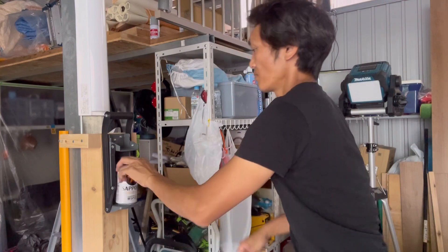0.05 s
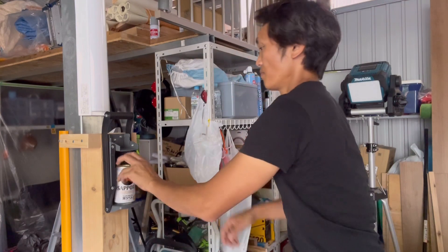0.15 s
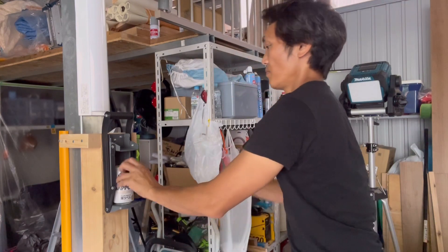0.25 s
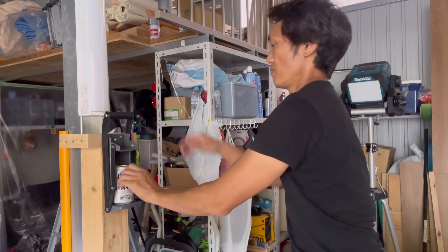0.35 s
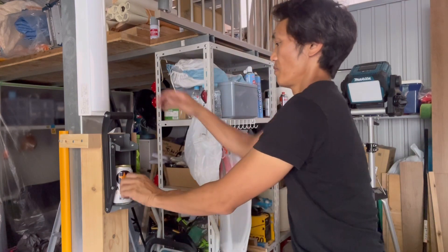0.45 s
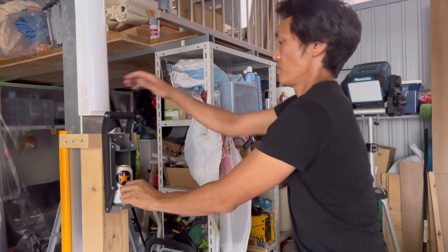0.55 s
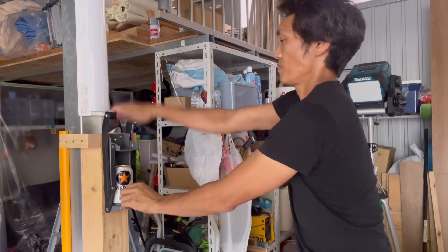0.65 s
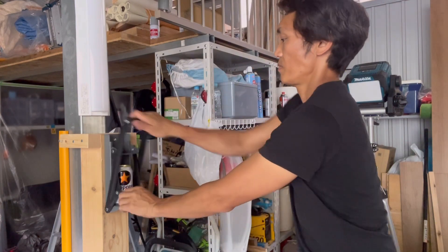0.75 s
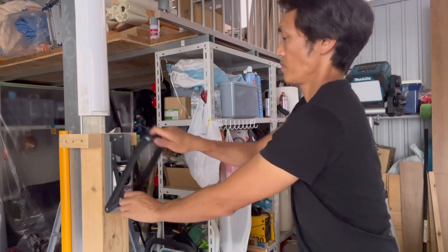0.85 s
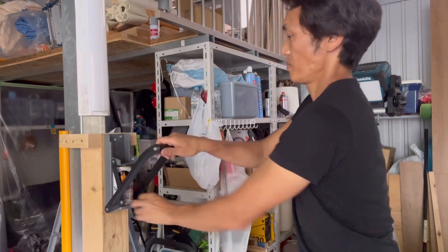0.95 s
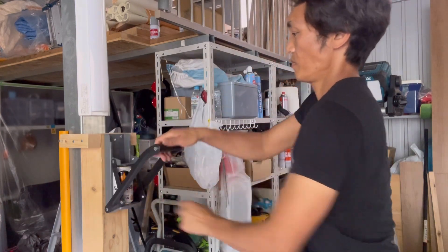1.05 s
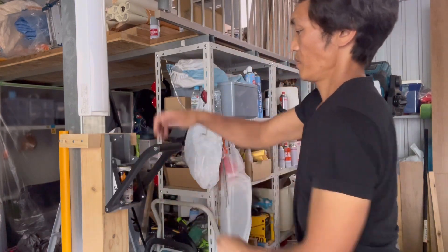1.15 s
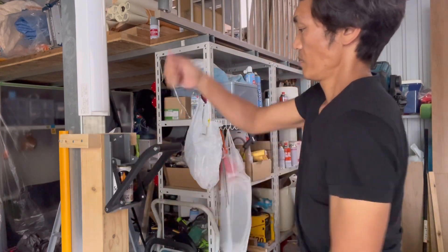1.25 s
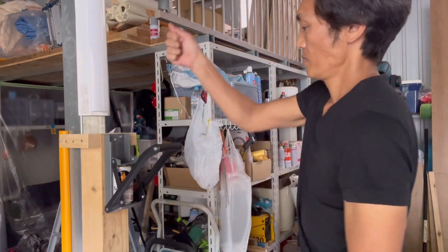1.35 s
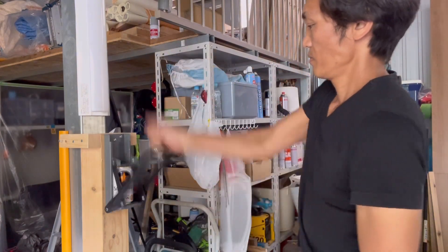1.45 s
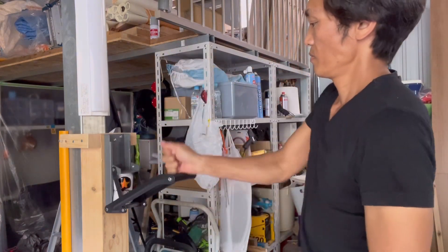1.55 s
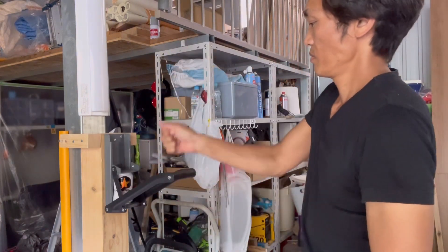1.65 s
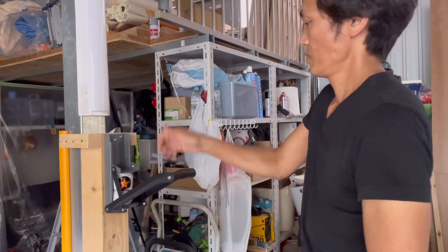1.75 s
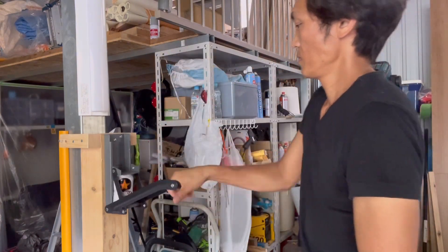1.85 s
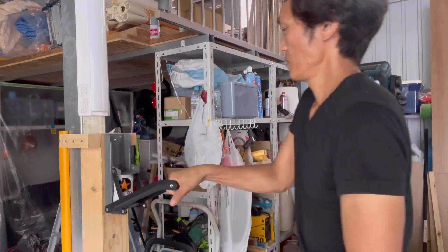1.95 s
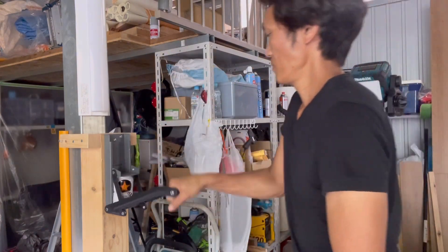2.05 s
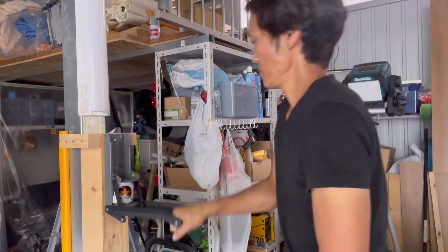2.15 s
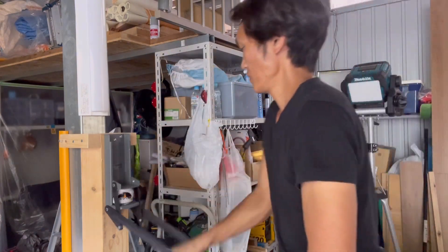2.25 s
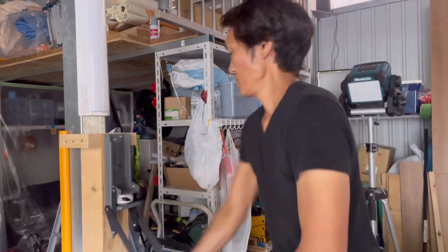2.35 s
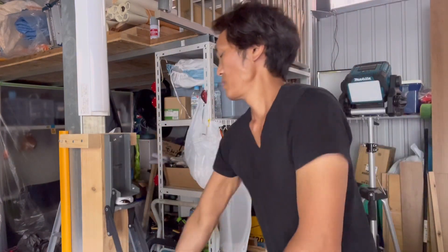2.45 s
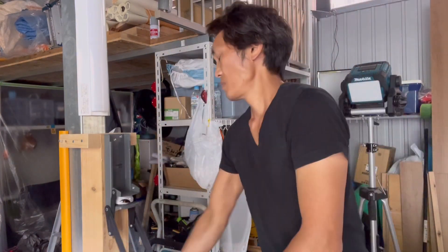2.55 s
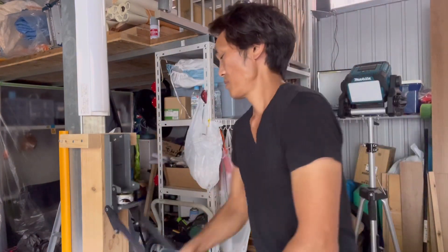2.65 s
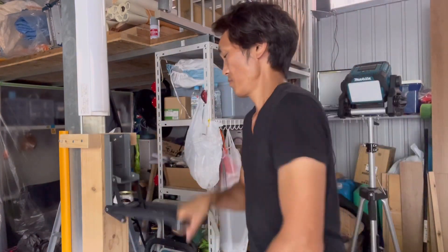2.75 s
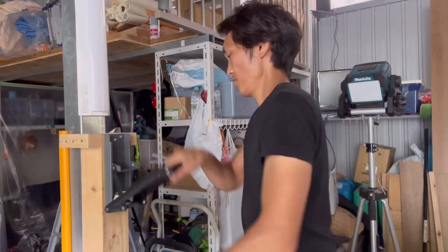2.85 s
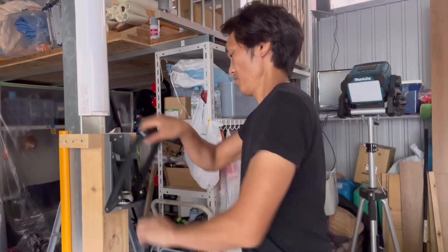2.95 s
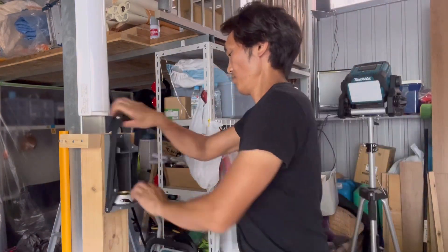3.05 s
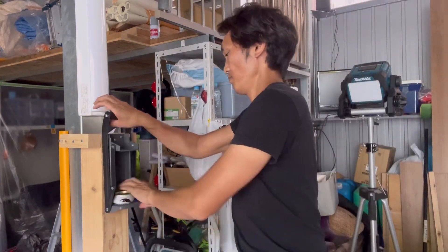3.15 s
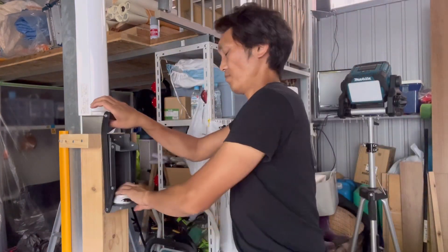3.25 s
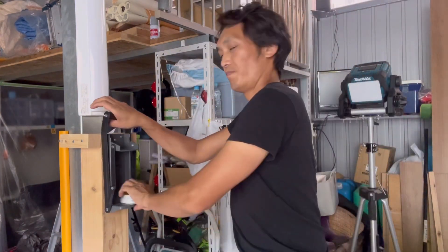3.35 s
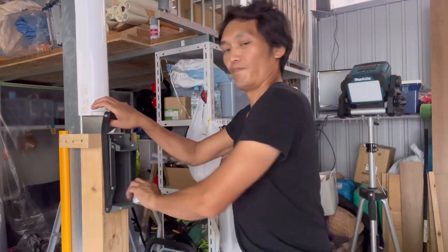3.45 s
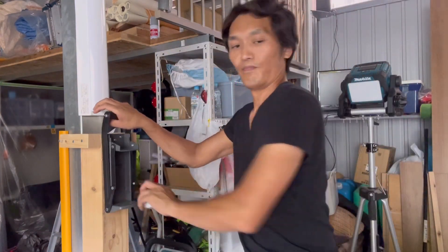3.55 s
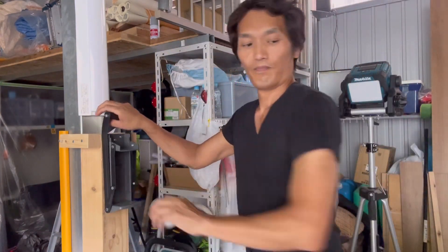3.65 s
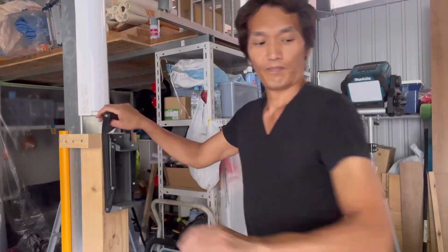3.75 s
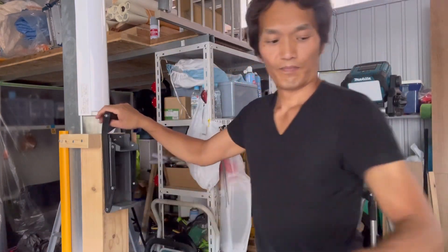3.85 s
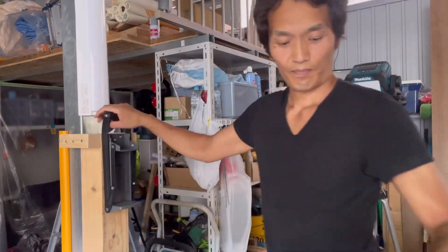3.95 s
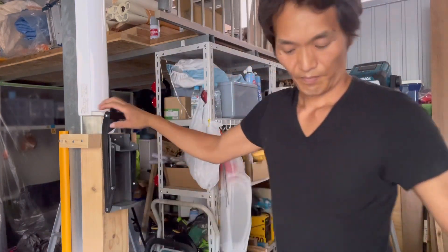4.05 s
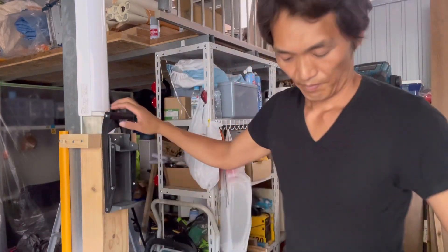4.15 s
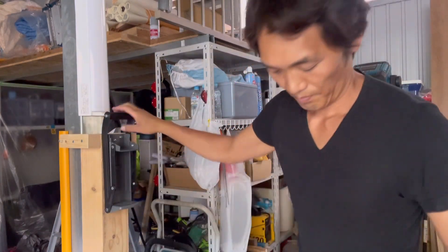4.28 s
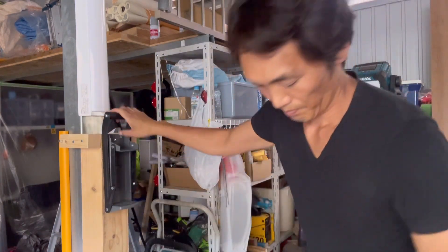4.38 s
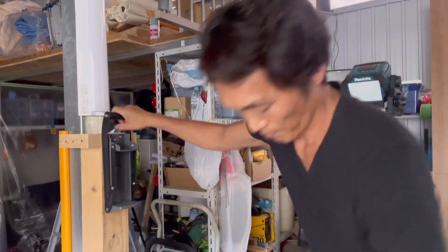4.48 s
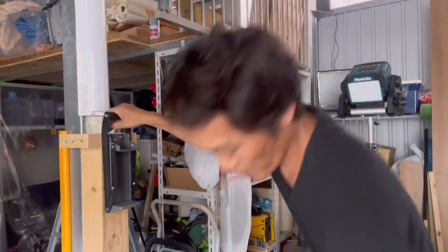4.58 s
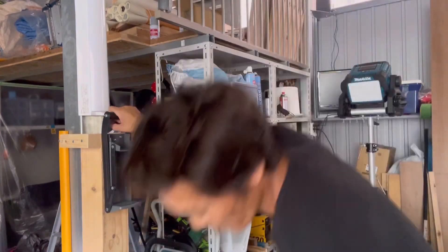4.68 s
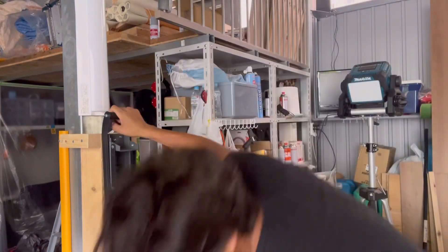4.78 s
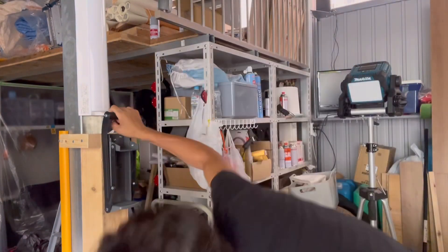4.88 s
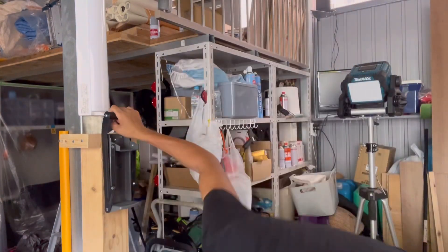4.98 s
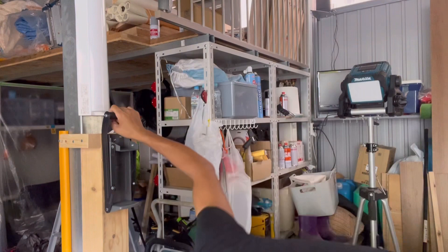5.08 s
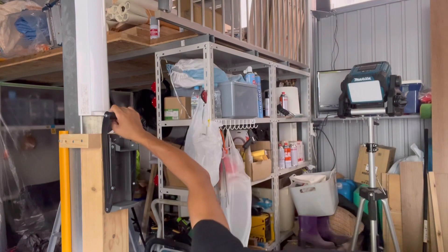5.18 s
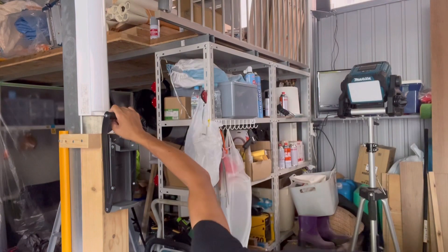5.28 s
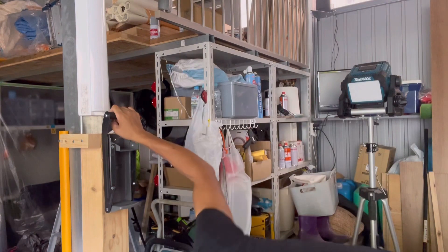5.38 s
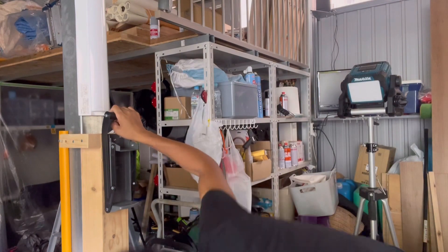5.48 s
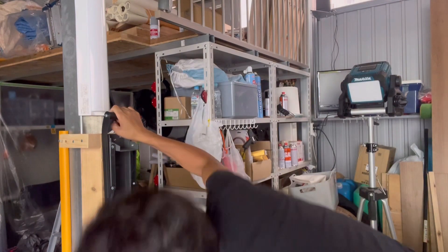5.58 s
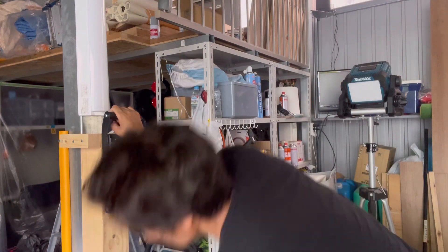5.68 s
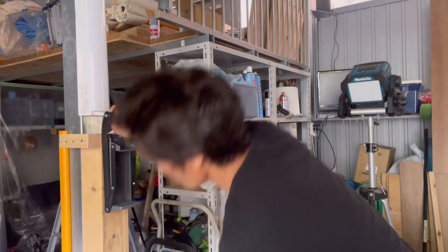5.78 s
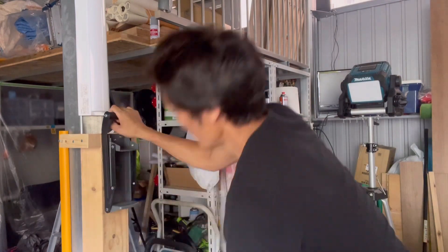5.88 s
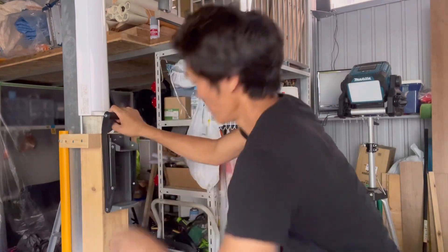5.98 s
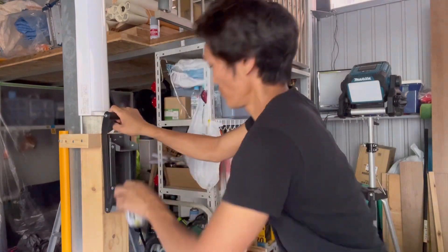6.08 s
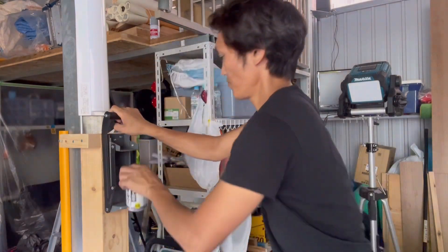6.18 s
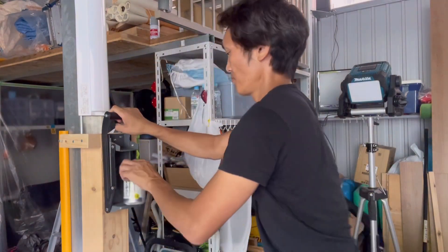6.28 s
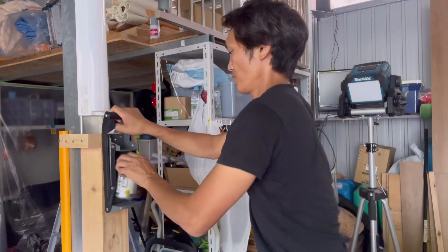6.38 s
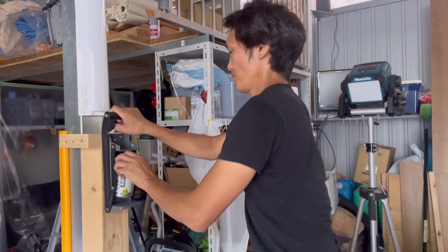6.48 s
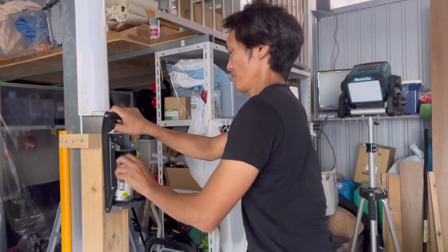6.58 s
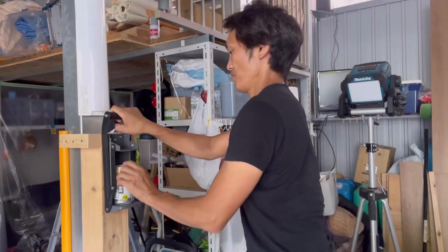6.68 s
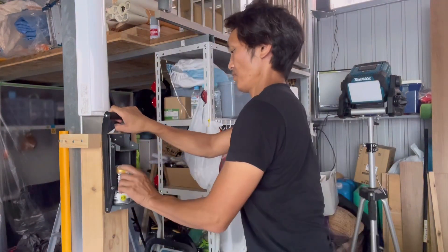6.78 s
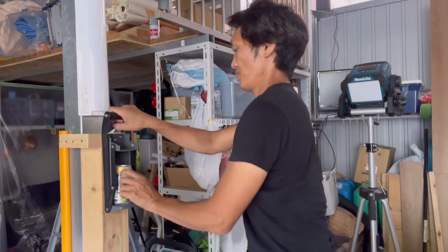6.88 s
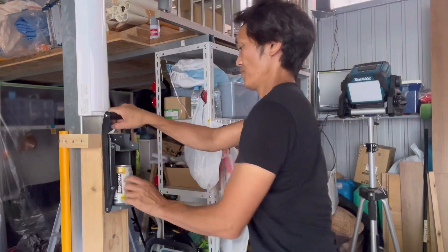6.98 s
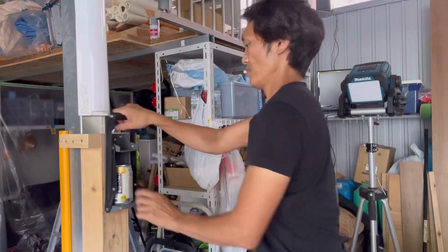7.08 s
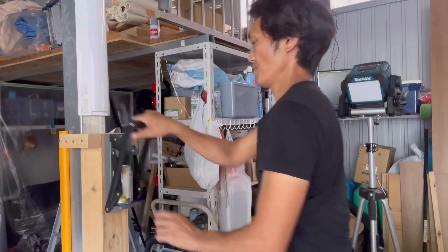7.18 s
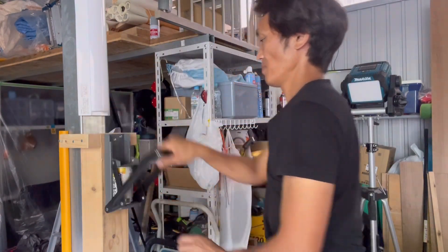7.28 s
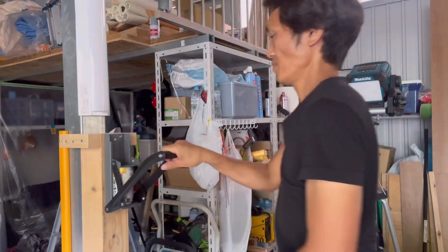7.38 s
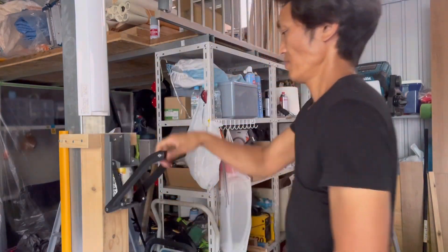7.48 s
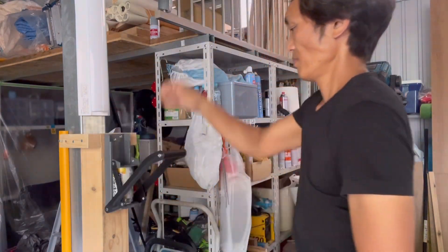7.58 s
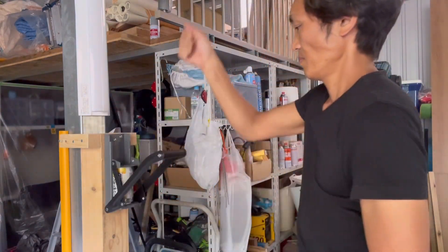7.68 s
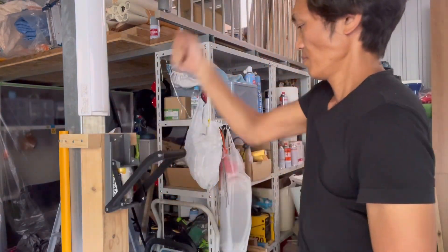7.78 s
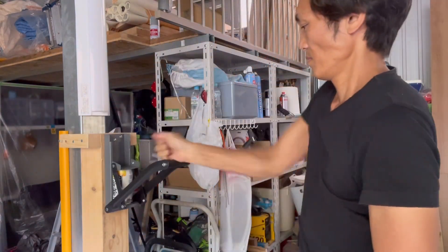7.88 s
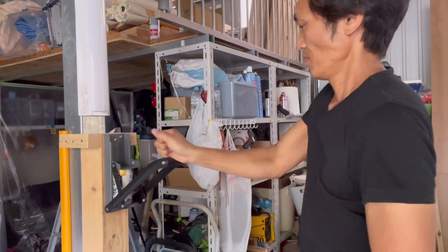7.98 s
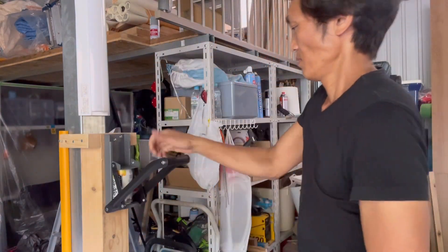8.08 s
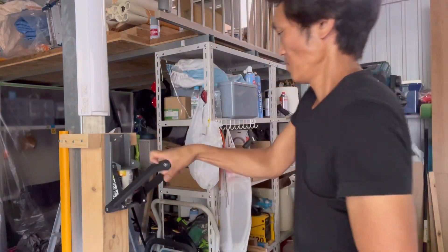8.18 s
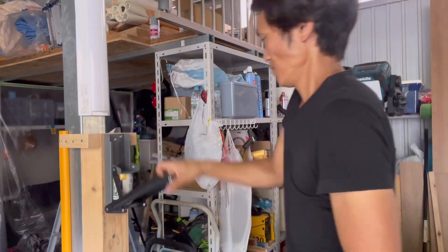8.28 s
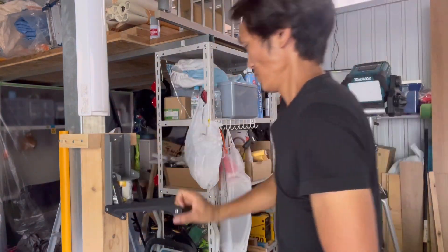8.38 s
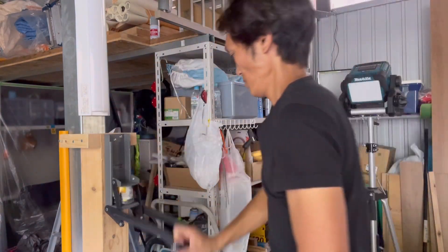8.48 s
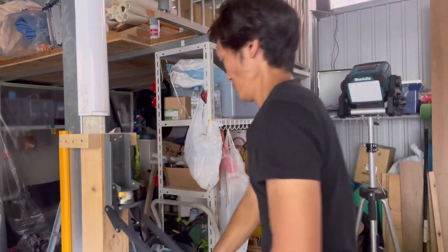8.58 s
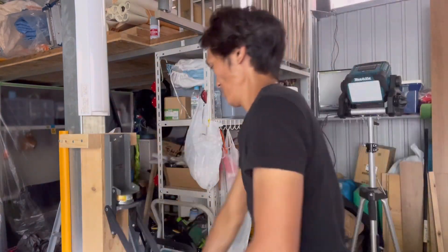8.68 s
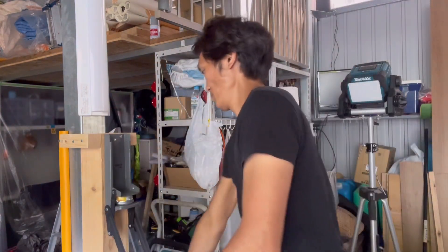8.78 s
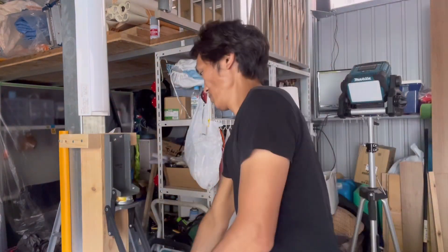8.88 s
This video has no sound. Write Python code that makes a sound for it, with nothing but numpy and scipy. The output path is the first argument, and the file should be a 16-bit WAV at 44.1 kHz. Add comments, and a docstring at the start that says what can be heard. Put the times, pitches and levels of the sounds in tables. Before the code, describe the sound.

A quiet storeroom with very faint air noise, heard close in stereo with a short, dense echo. From 0 to 0.35 s an empty can knocks hollowly in the crusher's cradle; around 0.7 s the lever is moved with soft rumble and a low hum. At 1.46 s a blow buckles the can with a broad crack and a pop plunging in pitch. A soft low knock at 1.8 s, then from 2.08 to 2.45 s a rapid run of bright crunching snaps. The lever rubs and clanks hard at 3.13 s; the flat can scrapes out at 3.3 s and lands in the bin at 4.15 s, bouncing until 4.5 s. Light rustles and taps around 5.1 s. Ringing knocks of a second can at 6.15 and 6.4-6.7 s, a loud snap at 7.3 s, a buckling crack at 7.86 s, crunching folds from 8.3 to 8.76 s.

```python
"""In a cluttered storeroom, a lever can crusher on a wooden post flattens two cans, one after the other. An
empty can knocks in the cradle, a slap on the lever buckles it and a pull folds it in a run of snaps. The lever
clanks home, the flat can slides out and drops into a bin; a second can is fetched and crushed. Blows are short
clicks that ring the metal and fill the room; strokes are filtered noise and tiny snaps. Low hums, singing cans
and a finger's brief squeak are sine tones."""
import sys
import numpy as np
from scipy import signal
from scipy.fft import rfft, irfft, next_fast_len
from scipy.io import wavfile

SR = 44100
rng = np.random.default_rng(int(sys.argv[2]) if len(sys.argv) > 2 else 0)


def dump_mix(stems):
    """Bounce the given channels to the path in sys.argv[1] as a 16-bit WAV at rate SR."""
    frames = np.atleast_2d(stems).T  # one column per channel
    limited = np.clip(frames, -1, 1)  # hard clip at full scale
    pcm = np.round(limited * 32767).astype(np.int16)
    wavfile.write(sys.argv[1], SR, pcm)


N = 393813
ECHO_SIZE = 30000  # samples in one blow and its echo
ECHO_TIME = np.arange(ECHO_SIZE) / SR  # seconds
ECHO_PATTERNS = 12

# Faint noise of the air. Each row: frequency in Hz, level in dB.
AIR_TONE = [(30, -3.5), (250, -13.5), (700, -19.5), (2000, -27), (8000, -33), (16000, -45)]
AIR_DB = -60.5
# How long the echo takes to fade by 60 dB. Each row: frequency in Hz, time in seconds.
ROOM_T60 = [(250, 0.63), (600, 0.33), (1500, 0.23), (5000, 0.31), (16000, 0.035)]
# How alike diffuse sound is at left and right. Each row: frequency in Hz, likeness from 0 to 1.
LIKENESS = [(100, 0.93), (250, 0.83), (600, 0.042), (5000, 0.014), (7500, 0.95), (15000, 1)]
# Lag of the far microphone port for a side of 1. Each row: frequency in Hz, lag in radians.
PORT_PHASE = [(200, 0.2), (800, 1.6), (1500, 1.7), (2800, 3.89), (6500, 8.5), (8500, 6.6), (11500, 3.7),
              (15500, 1)]
# Tone of the ports. Each row: frequency in Hz, level in dB.
PORT_COLOUR = [(8500, 1), (10300, -0.5), (11800, -7), (13200, 0.5), (14500, 5), (16000, -4.5)]
CUTOFF_HZ = 16100

# Moves of the hands on the crusher. Each row: start in seconds, length in seconds, post rumble in dB,
# frame drone in dB, rub in dB.
STROKES = [(0, 0.2, -57, -38, -36), (0.657, 0.15, -35.5, -42, -38), (1.587, 0.32, -32, -32, -37),
           (2.083, 0.31, -38.5, -30, -27.5), (2.603, 0.24, -38, -32.5, -34.5), (2.81, 0.22, -37, -34, -32),
           (3.148, 0.16, -31, -34.5, -32.5), (3.517, 0.66, -48.5, -50, -61),
           (4.683, 0.81, -57.5, -58.5, -65.5), (6.262, .7, -49, -45, -56), (7.088, 0.29, -46.5, -39, -38.5),
           (7.3, 0.29, -31, -40.5, -41.5), (7.904, 0.77, -32.5, -34.5, -38.5),
           (8.698, 0.19, -38.5, -41, -57)]
STROKE_ATTACK_S = 0.063
RUMBLE_FADE_DB_PER_S, DRONE_FADE_DB_PER_S, RUB_FADE_DB_PER_S = 42, 33.5, 101.5
# Buckles and clanks also jolt the post and the frame, this far below their own level.
JOLT_RUMBLE_DB, JOLT_DRONE_DB, JOLT_ATTACK_S = -24.5, -37.5, 0.013
# Tone of the shaken post. Each row: frequency in Hz, level in dB.
RUMBLE_TONE = [(22, -28.5), (36, -0.5), (50, 1), (75, -9.5), (102, -4), (125, -11), (160, -5), (300, -63.5)]
# Resonances of the frame. Each row: frequency in Hz, width in Hz, level in dB.
FRAME_RESONANCES = [(239.4, 15, 2), (265.3, 29, 0), (359.7, 52, -3.5)]
# Resonances of the lever. Each row: frequency in Hz, width in Hz, level in dB.
LEVER_RESONANCES = [(527, 85, 2.5), (750, 180, -1.5), (905, 160, -0.5), (1200, 250, -5.5), (1600, 680, -12),
                    (2840, 1800, -18.5), (5900, 14000, -30.5)]

# Cans shift in the bin and under the fingers. Each row: start in seconds, length in seconds, level in dB.
RUSTLES = [(3.42, 0.14, -50.5), (4.24, 0.074, -35), (5.08, 0.18, -39), (5.3, 0.17, -50),
           (6.355, 0.04, -38.5)]
# Tone of the rustling. Each row: frequency in Hz, level in dB.
RUSTLE_TONE = [(300, -7), (900, -3.5), (2500, -6.5), (8000, -9.5), (16000, -17)]
# The flat can slides out of the cradle. Each row: start in seconds, length in seconds, level in dB.
SLIDES = [(3.315, 0.042, -16)]
# Tone of the sliding. Each row: frequency in Hz, level in dB.
SLIDE_TONE = [(300, -19), (1200, 1), (1900, -14.5), (2450, 3.5), (2600, 2), (2760, -0.5), (3100, -11),
              (5700, -14), (16000, -27.5)]
# Metal crinkles between the loud folds. Each row: start in seconds, length in seconds, level in dB.
CRINKLES = [(2.09, 0.18, -30), (8.29, 0.32, -27), (8.71, 0.027, -22.5)]
# The frame or something near it hums low when struck or strained. Each row: start in seconds,
# length in seconds, level in dB, first pitch in Hz, last pitch in Hz; level and pitch then waver.
LOW_HUMS = [(0.706, 0.13, -30, 251, 241), (1.823, .16, -30.5, 278, 254), (2.432, 0.022, -19, 241.4, 237.7),
            (7.194, 0.12, -29.5, 235.6, 249.6), (8.333, 0.22, -29, 350, 344.7),
            (8.357, 0.22, -28, 240.2, 244.5)]
# One thin mode of the can or its tab sings out; the brief high tone at 6.298 s is a finger squeaking on the
# can. Each row: start in seconds, level in dB, pitch in Hz, # time to fade by 60 dB in seconds.
PINGS = [(0.129, -34.5, 2250, 0.64), (4.402, -24.5, 2340, .2), (6.148, -23, 1625, 0.24),
         (6.148, -31, 6330, 0.35), (6.298, -37.5, 6460, .15), (6.645, -20, 2275, 0.3),
         (7.3, -3.5, 1918, 0.13), (7.301, -19, 2930, .17)]

# The flat can lands and bounces in the bin. Each row: start in seconds, level in dB, strongest frequency
# in Hz, length of the contact in seconds.
DROPS = [(4.153, -6.5, 815, 0.0034), (4.161, -10.5, 183.3, 0.0095), (4.177, -7.5, 2000, 0.007),
         (4.292, -18, 201.5, 0.012), (4.378, -16, 1913, 0.0014), (4.402, -14.5, 1493, 0.0011),
         (4.408, -20.5, 137.1, 0.0067), (4.47, -22, 2230, 0.0015), (4.486, -20, 1320, 0.0017)]
# The hand catches the lever, or it meets its stops. Each row: start in seconds, level in dB,
# strongest frequency in Hz, length of the contact in seconds.
CLANKS = [(0.66, -40, 1600, 0.0027), (0.722, -32, 800, 0.0035), (1.822, -21, 319.6, 0.0048),
          (2.446, -25.5, 171, 0.0082), (2.637, -27.5, 1000, 0.004), (3.126, -9.5, 872, 0.0051),
          (3.138, -13.5, 402, 0.005), (3.158, -20, 2650, 0.014), (8.168, -33.5, 1510, 0.0012)]
# An empty can knocks against the cradle or its fellows. Each row: start in seconds, level in dB,
# strongest frequency in Hz, length of the contact in seconds.
KNOCKS = [(0.002, -15.5, 945, 0.0036), (0.112, -24.5, 980, 0.015), (0.236, -22.5, 1050, 0.0045),
          (0.33, -25, 1260, 0.015), (5.117, -28.5, 1600, 0.0013), (5.225, -30, 1200, 0.0035),
          (6.148, -11.5, 1050, 0.00097), (6.409, -15, 1170, 0.0024), (6.441, -9, 1320, 0.00073),
          (6.468, -16, 1270, 0.0051), (6.645, -12, 1012, 0.0026), (6.646, -20.5, 7630, 0.0013),
          (6.722, -21, 1266, 0.0013)]
# A blow on the lever buckles the can. Each row: start in seconds, level in dB, strongest frequency in Hz,
# length of the contact in seconds.
BUCKLES = [(1.464, -11.5, 1369, 0.0069), (7.861, -13, 1388, 0.0067)]
# The panel goes slack as it buckles, so its pitch dives; the level is against the blow.
DIVE_S, DIVE_END_HZ, DIVE_DB = 0.017, 150, 1.5
# The loudest folds of the wall under the ram, big facets low and small ones high. Each row: start in
# seconds, level in dB, strongest frequency in Hz, length of the snap in seconds.
FOLDS = [(2.081, -19.5, 6350, 0.00094), (2.096, -24, 4490, .001), (2.115, -20, 8500, 0.00078),
         (2.122, -20.5, 1600, 0.0013), (2.128, -10, 4660, .0018), (2.161, -16.5, 765, 0.0008),
         (2.177, -18, 1282, 0.0013), (2.202, -8, 1450, 0.00035), (2.21, -19, 6000, 0.0018),
         (2.221, -19.5, 1508, .002), (2.242, -21, 7220, 0.00099), (2.258, -22.5, 6710, 0.00079),
         (2.271, -10, 2020, 0.0021), (2.292, -21, 7800, 0.00086), (2.299, -22, 7560, .001),
         (2.399, -18.5, 4950, 0.0013), (2.424, -27, 4180, 0.0039), (2.596, -28.5, 5150, 0.0013),
         (7.296, -7, 2200, 0.0053), (7.297, -19.5, 8300, 0.00365), (8.298, -18.5, 2620, 0.003),
         (8.316, -14.5, 1600, 0.0013), (8.337, -13.5, 1210, 0.0011), (8.409, -11.5, 1686, 0.0014),
         (8.444, -29, 8170, .001), (8.47, -16, 1710, 0.00115), (8.487, -16, 2070, 0.0015),
         (8.508, -11, 4900, 0.0013), (8.531, -17, 7900, 0.0018), (8.622, -29.5, 7800, .002),
         (8.725, -19.5, 4300, 0.001), (8.759, -21, 810, 0.0024)]

# Ringing modes of the bin and the flat can in it. Each row: frequency in Hz, level in dB,
# time to fade by 60 dB in seconds.
BIN_MODES = [(104, -6.5, 0.22), (200, 6, 0.15), (1025, 0, 0.14), (1238, -2.5, .3), (1428, -6, 0.47),
             (2340, 1.5, .2)]
# Ringing modes of the steel lever. Each row: frequency in Hz, level in dB,
# time to fade by 60 dB in seconds.
LEVER_MODES = [(245, -11.5, .4), (981, 1, 0.16), (2250, -2, .22), (2500, 0, 0.32)]
# Ringing modes of the hollow, empty can. Each row: frequency in Hz, level in dB,
# time to fade by 60 dB in seconds.
CAN_MODES = [(246, -27.5, 0.57), (1063, -4, 0.06), (1180, 6.5, 0.04), (1354, 5.5, 0.034), (1686, -19, 0.29),
             (2300, -16, 0.18), (342, -7.5, 0.35)]
# Ringing modes of the buckling wall. Each row: frequency in Hz, level in dB,
# time to fade by 60 dB in seconds.
WALL_MODES = [(230, -15, .35), (1200, 0, 0.032), (1400, 5, .035), (2090, -3, 0.1)]
# Tone of a crack of thin metal. Each row: frequency in Hz, level in dB.
CRACK_TONE = [(60, -1.5), (200, 17), (600, 12.5), (1200, 8.5), (2000, 6), (2900, 3), (5000, -0.5),
              (8200, -1), (16000, -19.5)]
# Edges of the bands in which each contact gets its level. Each entry: frequency in Hz.
BAND_EDGES_HZ = [90, 450, 1000, 1700, 3500, 9500, 16000]
# How well the thin metal radiates in each of those bands. Each entry: level in dB.
RADIATION_DB = [0.94, -2.5, 0.76, 1, -0.88, 1]


def from_db(db):
    """Decibels to gain."""
    return 10 ** (np.asarray(db) / 20)


def rms_one(x):
    """Scale to rms 1."""
    return x / np.sqrt(np.mean(x ** 2) + 1e-20)


def at_hz(points, hz):
    """Read a table on a log-frequency axis."""
    points = np.array(points)
    return np.interp(np.log(np.maximum(hz, 1)), np.log(points[:, 0]), points[:, 1])


def bins(size):
    """Frequencies of a transform."""
    return np.arange(size // 2 + 1) * SR / size


def colour(x, spectrum):
    """Causal (minimum-phase) filter with the given dB spectrum."""
    size = 2 * next_fast_len(x.shape[-1] // 2 + 2048)
    cepstrum = irfft(np.log(from_db(at_hz(spectrum, bins(size)))))
    # folding the cepstrum forward in time keeps the filter from sounding early
    cepstrum[1:size // 2] *= 2
    cepstrum[size // 2 + 1:] = 0
    return irfft(rfft(x, size) * np.exp(rfft(cepstrum)))[..., :x.shape[-1]]


def band(x, low, high, order=2):
    """Butterworth band-pass."""
    sos = signal.butter(order, [low, high], "band", fs=SR, output="sos")
    return signal.sosfilt(sos, x + 1e-18)


def resonate(x, modes):
    """Pass a sound through parallel resonances of alternating sign, then scale to rms 1."""
    total = 0
    for k, (hz, width, db) in enumerate(modes):
        b, a = signal.iirpeak(hz, hz / width, fs=SR)
        total = total + (-1) ** k * from_db(db) * signal.lfilter(b, a, x + 1e-18)
    return rms_one(total)


def diffuse(size):
    """White stereo noise, as alike left and right as sound from all around."""
    fast = next_fast_len(size, True)
    mid, side = rfft(rng.standard_normal((2, fast)))
    alike = np.clip(at_hz(LIKENESS, bins(fast)), 0, 0.99)
    stereo = np.sqrt(1 + alike) * mid + np.sqrt(1 - alike) * side * [[1], [-1]]
    return rms_one(irfft(stereo, fast)[:, :size])


def clicks(size, per_s, spread_db):
    """Random tiny snaps of very uneven strength."""
    strength = from_db(spread_db * np.minimum(rng.exponential(1, size), 4))
    return (rng.random(size) < per_s / SR) * strength * rng.choice([-1, 1], size)


def jerks(per_s, spread_db):
    """Uneven gain, as of a joint that sticks and lets go."""
    steps = np.arange(N) / SR * per_s
    return from_db(spread_db * np.interp(steps, np.arange(ECHO_SIZE), rng.standard_normal(ECHO_SIZE)))


def swells(rows, attack_s, fade_db_per_s):
    """Gain over time of moves (start, length, dB): each rises, holds for its length and fades; powers add."""
    t, power = np.arange(0, N, 20) / SR, 0
    for start, length, db in rows:
        rise = np.clip((t - start) / attack_s, 0, 1)
        fade_db = fade_db_per_s * np.maximum(t - start - length, 0)
        power = power + (rise * from_db(db - fade_db)) ** 2
    return np.interp(np.arange(N) / SR, t, np.sqrt(power))


def storeroom(wet_db, build_s, late_db, late_t60):
    """Echo of one click: the direct sound, dense scatter off shelves, and a faint long ring of sheet walls."""
    tail, edges = 0, np.geomspace(50, 17000, 15)
    noises = diffuse(ECHO_SIZE), diffuse(ECHO_SIZE)
    for k, (low, high) in enumerate(zip(edges, edges[1:])):
        t60 = at_hz(ROOM_T60, np.sqrt(low * high))
        scatter = 1000 ** (-ECHO_TIME / t60)
        late_ring = from_db(late_db) * 1000 ** (-ECHO_TIME / late_t60)
        tail = tail + band(noises[k % 2], low, high) * (scatter + late_ring) / np.sqrt(t60)
    tail = rms_one(tail * (1 - np.exp(-ECHO_TIME / build_s))) / np.sqrt(ECHO_SIZE)
    return from_db(wet_db) * tail + (ECHO_TIME == 0)


def in_room(dry, room):
    """Play a sound in the room at unchanged power."""
    unit_room = room / np.linalg.norm(room, axis=1, keepdims=True)
    return signal.fftconvolve(dry[None], unit_room, axes=1)[:, :N]


def ports(x, side, pan_db):
    """Sound from one side reaches the two microphone ports out of step."""
    size = next_fast_len(N + ECHO_SIZE, True)
    turn = np.exp(0.5j * side * at_hz(PORT_PHASE, bins(size)) * np.array([[1], [-1]]))
    return irfft(rfft(x, size) * turn, size)[:, :N] * from_db([[pan_db / 2], [-pan_db / 2]])


def still_air():
    """Steady, faint noise from all around, strongest in the bass."""
    return from_db(AIR_DB) * rms_one(colour(diffuse(N), AIR_TONE))


def shaking(column, jolt_db, fade_db_per_s):
    """Gain of a part that both strokes and blows set going; their powers add."""
    strokes = [(row[0], row[1], row[column]) for row in STROKES]
    blows = [(s, JOLT_ATTACK_S, db) for s, db, *_ in BUCKLES + CLANKS]
    jolts = from_db(jolt_db) * swells(blows, JOLT_ATTACK_S, fade_db_per_s)
    return np.hypot(swells(strokes, STROKE_ATTACK_S, fade_db_per_s), jolts)


def post_rumble():
    """The wooden post shakes with strokes and blows: bass-heavy noise."""
    return shaking(2, JOLT_RUMBLE_DB, RUMBLE_FADE_DB_PER_S) * rms_one(colour(diffuse(N), RUMBLE_TONE))


def frame_drone():
    """The steel frame resonates at a few low pitches when shaken."""
    drone = band(resonate(diffuse(N), FRAME_RESONANCES), 93, 490)
    return shaking(3, JOLT_DRONE_DB, DRONE_FADE_DB_PER_S) * drone


def pivot_rub(room):
    """The pivots slip in small jerks as the lever moves, and the slips ring the lever."""
    slips = band(resonate(clicks(N, per_s=1200, spread_db=1.5), LEVER_RESONANCES), 520, 8700, order=4)
    strokes = [(start, length, rub_db) for start, length, _, _, rub_db in STROKES]
    gain = swells(strokes, STROKE_ATTACK_S, RUB_FADE_DB_PER_S)
    return in_room(gain * jerks(per_s=45, spread_db=4.0) * slips, room)


def grains(gain, tone, room, per_s, spread_db):
    """Dense little snaps and slips under a stroke, heard in the room."""
    return in_room(rms_one(colour(clicks(N, per_s, spread_db), tone)) * gain, room)


def rustle(room):
    """Shifting cans touch in dense, tiny, very uneven clicks."""
    gain = swells(RUSTLES, attack_s=0.058, fade_db_per_s=124.5)
    return grains(gain, RUSTLE_TONE, room, per_s=6200, spread_db=6.5)


def slide(room):
    """The flat can scrapes out of the cradle in dense, nearly even slips."""
    gain = swells(SLIDES, attack_s=0.062, fade_db_per_s=397.5)
    return grains(gain, SLIDE_TONE, room, per_s=1800, spread_db=0.5)


def crinkle(room):
    """Small creases in the metal snap sparsely while the ram moves."""
    gain = swells(CRINKLES, attack_s=0.022, fade_db_per_s=250.5)
    return grains(gain, CRACK_TONE, room, per_s=200, spread_db=3)


def low_hums(waver_hz, attack_s, fade_db_per_s):
    """The frame or something near it, struck or strained, gives a nearly steady, wavering low hum."""
    out = np.zeros(N + ECHO_SIZE)
    for s, length, db, first_hz, last_hz in LOW_HUMS:
        # both wander to a new random value 60 times a second
        waver, strength = (np.interp(ECHO_TIME * 60, np.arange(64), row)
                           for row in rng.standard_normal((2, 64)))
        hz = np.interp(ECHO_TIME, [0, length], [first_hz, last_hz]) + waver_hz * waver
        fade_db = fade_db_per_s * np.maximum(ECHO_TIME - length, 0)
        gain = np.minimum(ECHO_TIME / attack_s, 1) * from_db(db + 4.6 * strength - fade_db)
        out[round(s * SR):][:ECHO_SIZE] += gain * np.sin(2 * np.pi * np.cumsum(hz) / SR)
    return out[:N]


def pings():
    """Thin rings of the can, and a brief squeak of a finger: fading sines with a random waver in level, like
    that of close modes beating."""
    out = np.zeros(N + ECHO_SIZE)
    for s, db, hz, t60 in PINGS:
        ring = from_db(db - 60 * ECHO_TIME / t60) * np.sin(2 * np.pi * hz * ECHO_TIME)
        out[round(s * SR):][:ECHO_SIZE] += ring
    return out[:N] * jerks(per_s=110, spread_db=3.5)


def band_levels(db, centre_hz, fall_db, thud_db, sizzle_db):
    """A contact is loudest near its own frequency, fall_db weaker an octave away and flatter beyond."""
    middles = np.sqrt(np.multiply(BAND_EDGES_HZ[:-1], BAND_EDGES_HZ[1:]))
    octaves = np.abs(np.log2(middles / centre_hz))
    levels = db + np.array(RADIATION_DB) - fall_db * octaves ** 0.64
    # the body sets the bass thud and the top sizzle
    return levels + thud_db * (middles == middles[0]) + sizzle_db * (middles == middles[-1])


def contacts(rows, modes, rooms, fall_db, thud_db, sizzle_db, ring_db, detune, chatter_db, wet_db,
             pop_db=-14, pop_cycles=13):
    """Each contact snaps and chatters; it cracks, pops at its own pitch, rings the modes and fills the room."""
    out, (hz, mode_db, t60) = np.zeros((2, N + ECHO_SIZE)), np.transpose(modes)
    t, attack, padded = ECHO_TIME[:ECHO_SIZE // 2], int(0.02 * SR), ECHO_SIZE * 3 // 2
    crack = colour(1.0 * (t == 0), CRACK_TONE)
    decay = from_db(mode_db)[:, None] * 1000 ** (-t / t60[:, None])
    filters = [signal.butter(3, edge, "band", fs=SR, output="sos")
               for edge in zip(BAND_EDGES_HZ, BAND_EDGES_HZ[1:])]
    for k, (s, level_db, centre_hz, length) in enumerate(rows):
        progress = np.minimum(ECHO_TIME / max(length, 1e-4), 6)
        to_come = np.exp(-progress ** 2)
        # the chatter swells and dies
        chatter = clicks(attack * 2, per_s=6000, spread_db=3) * (progress * to_come)[:attack * 2]
        # the longer the contact, the more of it is chatter
        force = from_db(chatter_db) * chatter / (np.linalg.norm(chatter) + 1e-9) * length * 1000
        force[0] += 1
        # facets face different ways, so echo patterns take turns; echoes build up while the contact lasts
        echo_gain = from_db(wet_db) * np.linalg.norm(force) * (1 - to_come)
        arrivals = echo_gain * rooms[k % len(rooms)]
        arrivals[:, :len(force)] += force
        # a dent changes the shape, so the modes shift and share the blow differently every time
        shift, share = rng.standard_normal((2, len(hz), 1))
        tones = np.sin(2 * np.pi * hz[:, None] * (1 + detune * shift) * t)
        ring = (from_db(3 * share) * decay * tones).sum(0)
        # the pop fades by 60 dB in pop_cycles cycles
        pop_gain = from_db(pop_db - 60 * np.minimum(t * centre_hz / pop_cycles, 4))
        pop = pop_gain * np.sin(2 * np.pi * centre_hz * t)
        body = crack + pop + from_db(ring_db) * ring
        heard = irfft(rfft(body, padded) * rfft(arrivals, padded))[:, :ECHO_SIZE]
        start = max(round(s * SR), 0)
        # each band is set to its level over the first 20 ms
        for sos, db in zip(filters, band_levels(level_db, centre_hz, fall_db, thud_db, sizzle_db)):
            part = signal.sosfilt(sos, heard)
            loudness = part[:, :attack].std(axis=1, keepdims=True)
            out[:, start:start + ECHO_SIZE] += from_db(db) * part / loudness
    return out[:, :N]


def bin_drops(rooms):
    """The flat can strikes the bin with long chatter and rings both."""
    return contacts(DROPS, BIN_MODES, rooms, fall_db=7.0, thud_db=-1.5, sizzle_db=1.0, ring_db=-39.5,
                    detune=0.0037, chatter_db=3.0, wet_db=0.6)


def lever_clanks(rooms):
    """A catch or a stop strikes the steel lever, with some thud and little sizzle."""
    return contacts(CLANKS, LEVER_MODES, rooms, fall_db=8.0, thud_db=1.5, sizzle_db=-8.5, ring_db=-36,
                    detune=0.0047, chatter_db=-3.0, wet_db=0.6)


def can_knocks(rooms):
    """A light knock rings the hollow can strongly at nearly fixed pitches."""
    return contacts(KNOCKS, CAN_MODES, rooms, fall_db=11.5, thud_db=0.0, sizzle_db=-1, ring_db=-22,
                    detune=0.0072, chatter_db=-1.5, wet_db=0.6, pop_cycles=14.7)


def dives():
    """A buckling panel pops inward: one short swell of sound that plunges in pitch."""
    out, progress = np.zeros(N + ECHO_SIZE), np.minimum(ECHO_TIME / DIVE_S, 1)
    for s, db, first_hz, _ in BUCKLES:
        hz = first_hz + (DIVE_END_HZ - first_hz) * progress ** 2
        gain = from_db(db + DIVE_DB) * np.sin(np.pi * progress)
        out[round(s * SR):][:ECHO_SIZE] += gain * np.sin(2 * np.pi * np.cumsum(hz) / SR)
    return out[:N]


def can_buckles(rooms):
    """A blow makes the wall give way: a broad, chattering crack with a diving pop."""
    crack = contacts(BUCKLES, WALL_MODES, rooms, fall_db=2.5, thud_db=-3.0, sizzle_db=-1.0, ring_db=-48.5,
                     detune=0.041, chatter_db=4, wet_db=-1.4)
    return crack + dives()


def wall_folds(rooms):
    """The ram folds the wall facet by facet, each snap with its own pitch and shifted modes."""
    return contacts(FOLDS, WALL_MODES, rooms, fall_db=8.0, thud_db=-5.5, sizzle_db=1.0, ring_db=-37.5,
                    detune=0.04, chatter_db=-4, wet_db=-1.3)


def scene():
    """The crusher on the left, the bin and the spare cans on the right, in still air."""
    rooms = [storeroom(wet_db=0, build_s=0.00094, late_db=-29.5, late_t60=0.8)
             for _ in range(ECHO_PATTERNS)]
    moving = post_rumble() + frame_drone() + pivot_rub(rooms[1])
    scraping = slide(rooms[-1]) + crinkle(rooms[-1])
    tones = low_hums(waver_hz=15, attack_s=0.02, fade_db_per_s=218.5) + pings()
    striking = lever_clanks(rooms) + can_knocks(rooms) + can_buckles(rooms) + wall_folds(rooms)
    crusher = moving + scraping + tones + striking
    bin_side = rustle(rooms[0]) + bin_drops(rooms)
    return still_air() + ports(bin_side, side=-0.82, pan_db=-0.2) + ports(crusher, side=0.8, pan_db=1.3)


def record(dry):
    """The ports colour the high treble, the loudest peaks overload softly, the top is cut."""
    heard = colour(dry, PORT_COLOUR)
    rounded = heard / (1 + heard ** 6) ** (1 / 6)
    top_cut = signal.ellip(10, 0.1, 70, CUTOFF_HZ, fs=SR, output="sos")
    return signal.sosfilt(top_cut, rounded)


dry = scene()
out = record(dry)
dump_mix(out)
```